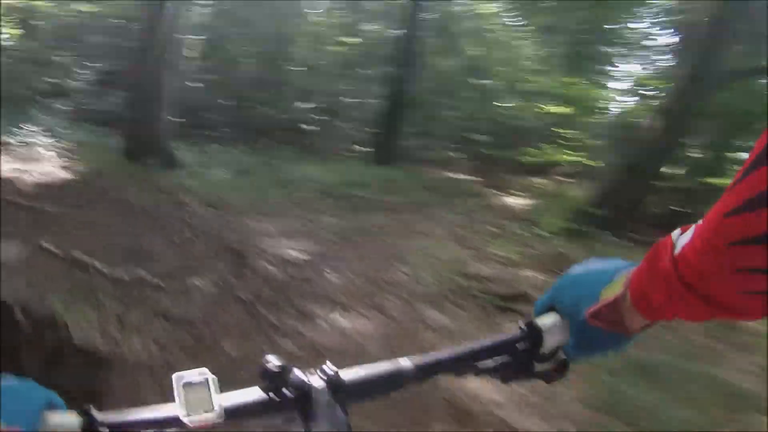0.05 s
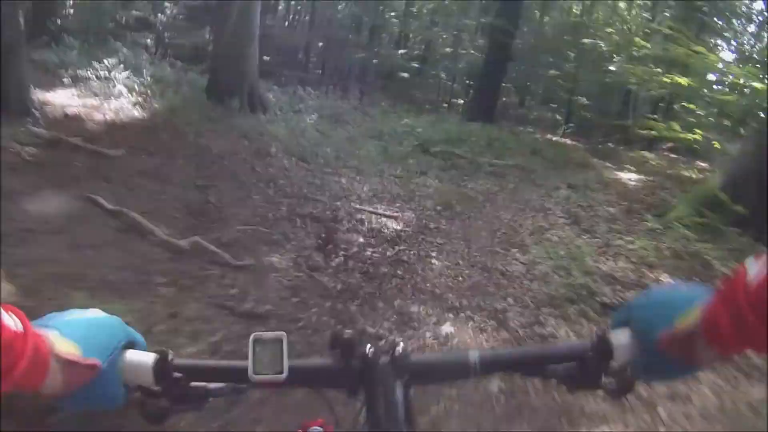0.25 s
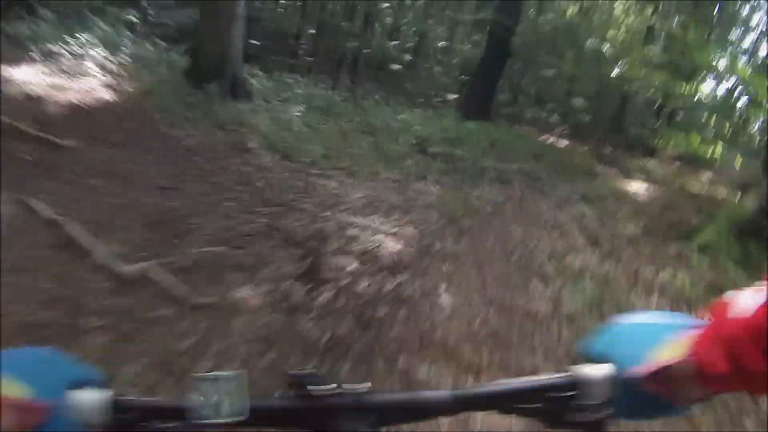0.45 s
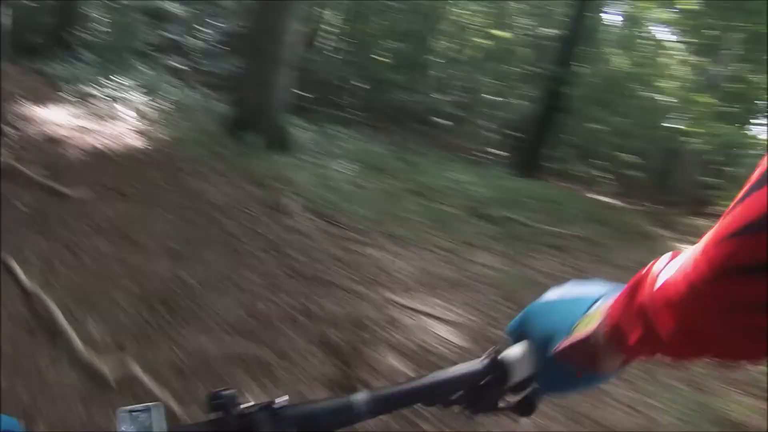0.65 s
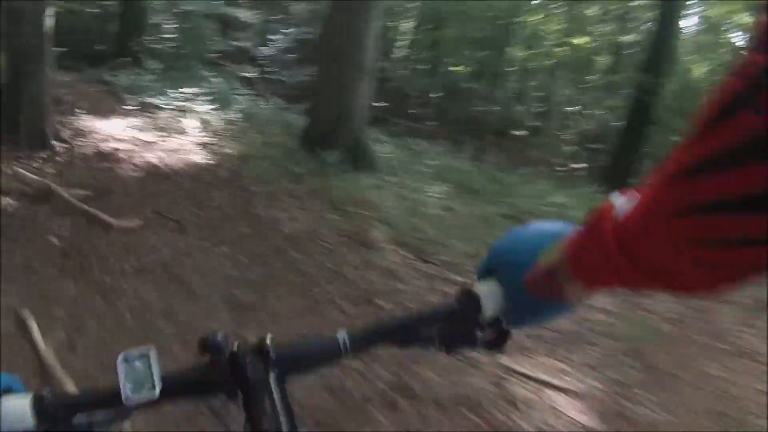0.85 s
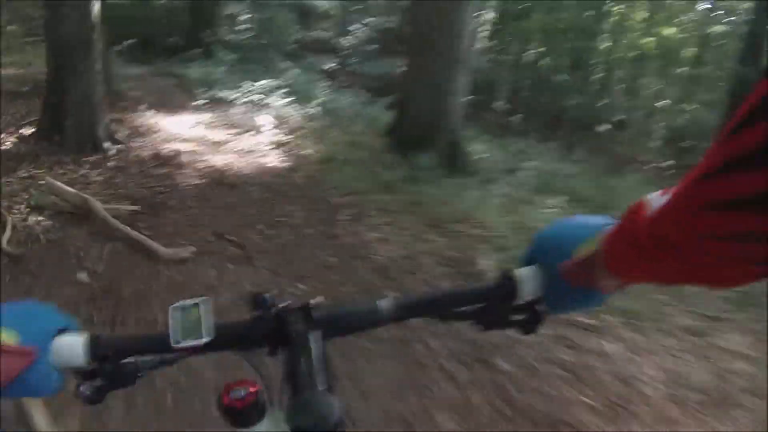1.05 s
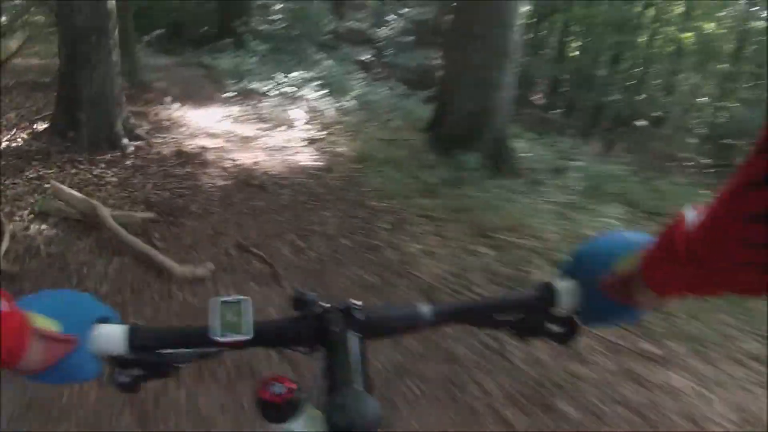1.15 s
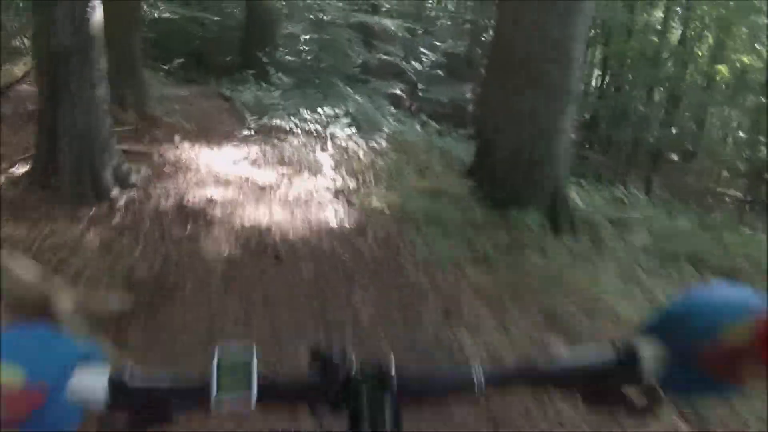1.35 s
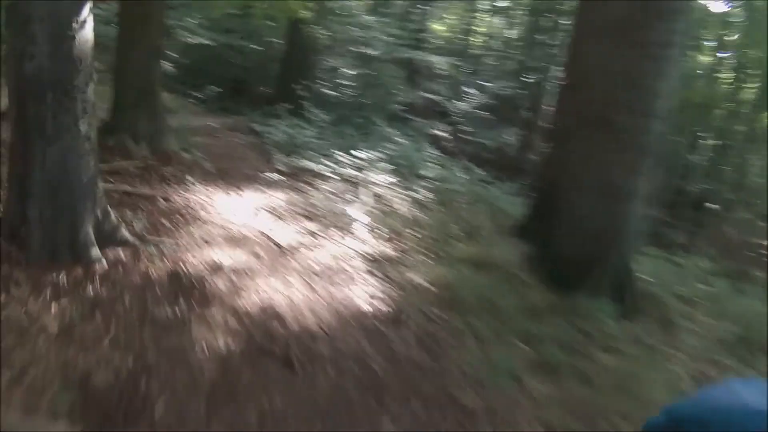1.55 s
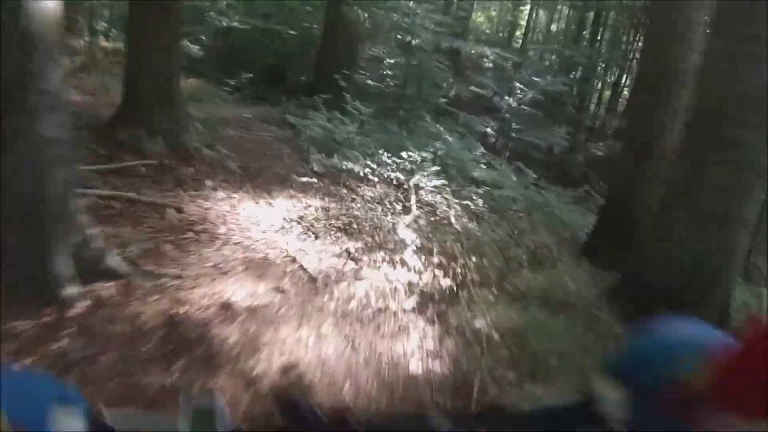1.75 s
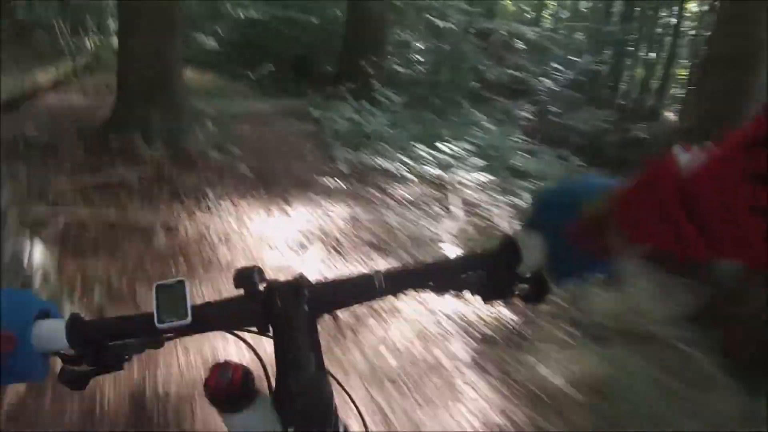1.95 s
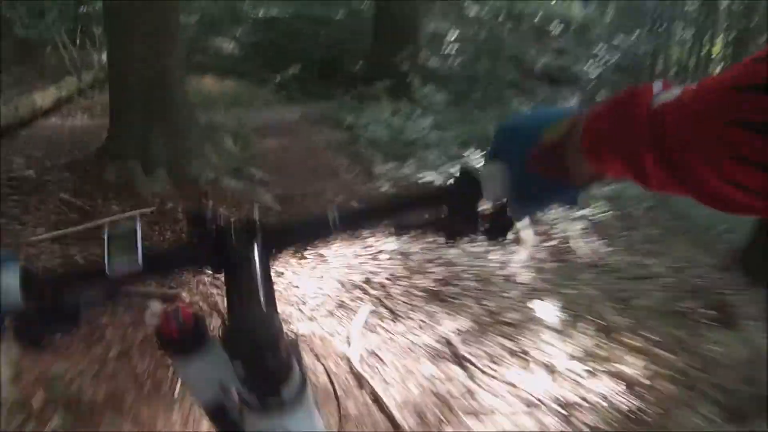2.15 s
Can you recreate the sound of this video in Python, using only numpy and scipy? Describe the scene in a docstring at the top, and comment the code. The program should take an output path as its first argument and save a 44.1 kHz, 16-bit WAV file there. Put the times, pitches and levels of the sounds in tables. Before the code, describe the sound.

Mountain bike rolling over dirt and leaves, freehub ticking, loose parts rattling and clacking sharply twice.

```python
"""Freehub ticking on a mountain bike that coasts down a forest trail; two pawls drop into each tooth.
Tyres roll over dirt, dry leaves and roots and snap twigs. Loose parts rattle on bumps and clack twice,
ringing the plastic case of the rider's camera and a smaller fitting; the frame knocks dully.
Air and jolts buffet the microphone."""
import sys
import numpy as np
from scipy import signal
from scipy.fft import rfft, irfft, next_fast_len
from scipy.io import wavfile
from scipy.ndimage import map_coordinates

SR = 44100
rng = np.random.default_rng(int(sys.argv[2]) if len(sys.argv) > 2 else 0)


def inscribe(sig):
    """Save sig as 16-bit PCM at rate SR to the path in sys.argv[1].

    A 1-D sig is mono; a 2-D sig holds one channel per row.
    Samples are clipped to [-1, 1] before scaling.
    """
    pcm = np.round(np.clip(np.atleast_2d(sig).T, -1, 1) * 32767)
    wavfile.write(sys.argv[1], SR, pcm.astype(np.int16))


N = 97020

# tyres on dirt, envelope: t/s, relative level/dB
DIRT_ENVELOPE = [(0.0, -61), (0.28, -55.5), (2.2, -54)]
# dirt spectrum: f/Hz, relative level/dB
DIRT_SPECTRUM = [(250, -13.5), (1200, -14.5), (1600, 3.5), (1980, -7), (2350, 3.5), (2750, -13),
                 (3300, 4.5), (3750, -7), (4300, -26), (9000, -57), (15000, -78)]
# leaf crunch, envelope: t/s, relative level/dB
LEAF_ENVELOPE = [(0.0, -70), (2.0, -66.5), (2.2, -54.5)]
# leaf and twig spectrum: f/Hz, relative level/dB
LEAF_SPECTRUM = [(600, -12.5), (1500, 3), (5600, 3.5), (6400, 0), (7200, 4.5), (8300, -4.5), (10300, -3),
                 (15500, -30)]
# tread scraping through leaves: t/s, length/s, relative level/dB
LEAF_SCRAPES = [(.44, 0.093, -65), (1.0, 0.065, -59), (1.10, 0.07, -57.5), (1.885, 0.13, -58.5),
                (2.068, 0.068, -54), (2.16, .07, -55.5)]
# tyres scrubbing bare earth in the bend: t/s, length/s, level/dB
EARTH_SCRUBS = [(.33, .22, -63)]
# earth spectrum: f/Hz, relative level/dB
EARTH_SPECTRUM = [(200, -22), (680, 7), (1300, -34)]
# wheels over roots: t/s, length/s, level/dB
ROOT_RUMBLES = [(.66, 0.043, -60), (1.0, 0.32, -64.5), (1.48, 0.04, -54), (1.54, 0.17, -61),
                (1.78, 0.16, -64.5)]
# rolling drone spectrum: f/Hz, relative level/dB
DRONE_SPECTRUM = [(40, 7), (95, 1), (190, -6.5), (500, -15.5), (1100, -16), (3000, -50), (12000, -100)]
# air buffeting, envelope: t/s, level/dB
WIND_ENVELOPE = [(0, -46), (.3, -44.5), (1.45, -40.5), (2.2, -46.5)]
# buffeting spectrum: f/Hz, relative level/dB
WIND_SPECTRUM = [(4, -14), (15, -2.5), (28, -8), (60, -29.5), (300, -61.5)]
# pressure thumps from jolts: t/s, peak/dB, half width/s
JOLTS = [(0.313, -33.5, 0.01), (0.688, -38, 0.0045), (0.491, -33, 0.013), (1.003, -28, 0.012),
         (1.201, -23.5, 0.013), (1.497, -25, 0.0088), (1.896, -33, 0.0067)]
# freehub speed: t/s, rate/(teeth/s)
TOOTH_RATE = [(0.03, 34.68), (0.269, 44.2), (0.311, 32.03), (0.475, 47.15), (0.538, 35.09), (0.744, 35.45),
              (0.867, 44.83), (1.076, 35.03), (1.238, 34.6), (1.283, 42.34), (1.477, 30.43), (1.613, 39.25),
              (1.888, 42.73), (2.029, 35.04), (2.2, 32.97)]
# freehub envelope: t/s, relative level/dB
HUB_ENVELOPE = [(0, -48), (.17, -42.5), (.39, -48), (.57, -42), (.88, -47), (1.15, -42), (1.5, -48.5),
                (1.76, -42.5), (2.2, -47.5)]
# contact crack spectrum: f/Hz, relative level/dB
CRACK_SPECTRUM = [(200, -13), (1200, -7), (1500, 8.5), (3800, 3.5), (5300, 0), (6200, -7.5), (7200, -1),
                  (8400, -8.5), (10300, -4), (15500, -28.5)]
# twigs snapping: t/s, level/dB
TWIG_SNAPS = [(.118, -53.5), (1.9225, -41), (1.9335, -38)]
# camera case modes: f/Hz, relative level/dB, T60/s
CASE_MODES = [(1451, 4, .037), (1622, 4, .046), (1860, -13, .035), (2336, 8, .026), (2495, 6, .021),
              (2810, -15, .035), (3160, -5, .019), (3325, -13, .045), (3574, -10, .015), (4498, -16, .022),
              (7170, -8, .025)]
# small loose fitting, modes: f/Hz, relative level/dB, T60/s
FITTING_MODES = [(1635, -8, .038), (1961, -3, .018), (2335, -3, .032), (3385, 2, .025), (3840, 2, .013),
                 (5269, -13, .019), (6964, -11, .015)]
# light rattles on bumps: t/s, relative level/dB
BUMP_RATTLES = [(0.257, -39), (0.29, -42), (0.3600, -45.5), (0.4445, -46.5), (0.4767, -44), (0.5107, -43),
                (0.5755, -46.5), (0.647, -43.5), (1.0038, -39.5), (1.2085, -44.5), (1.447, -43),
                (1.539, -47), (1.5673, -46), (1.6220, -43), (1.672, -44), (1.741, -44.5), (1.9085, -41)]
# first clack, on the case: t/s, ring gain/dB, focus/Hz, crack/dB
CASE_CONTACTS = [(.97127, -8, 5400, -31), (.97188, -12.5, 3470, -21), (.97463, -30, 2550, -14),
                 (.97828, -23, 3090, -22.5), (.98665, -48, 7000, -30)]
# second clack, on the fitting: t/s, ring gain/dB, focus/Hz, crack/dB
FITTING_CONTACTS = [(1.28023, -31, 3980, -36), (1.2844, -19, 5140, -31), (1.28685, -13.5, 3860, -23),
                    (1.28874, -22, 2200, -25), (1.30734, -39, 2860, -38)]
# frame knocks: t/s, level/dB
FRAME_KNOCKS = [(.953, -43), (1.168, -50), (1.284, -41)]
# frame spectrum: f/Hz, relative level/dB
FRAME_SPECTRUM = [(90, 0), (170, -6), (290, -0.5), (450, -12.5), (1500, -28)]


def amp(db):
    """dB to gain."""
    return 10 ** (np.asarray(db) / 20)


def unit(x):
    """Scale to rms 1."""
    return x / np.sqrt(np.mean(x ** 2) + 1e-20)


def curve(rows):
    """One value per sample from (t/s, value) rows."""
    return np.interp(np.arange(N) / SR, *np.transpose(rows))


def wobble(rate_hz):
    """Smooth curve through random knots."""
    knots = rng.standard_normal(int(N * rate_hz / SR) + 4)
    return map_coordinates(knots, [np.arange(N) * rate_hz / SR])


def colour(x, spectrum):
    """Minimum-phase filter; white noise keeps its power."""
    size = next_fast_len(N + SR // 4) * 2
    hz, db = np.transpose(spectrum)
    bins_hz = np.fft.rfftfreq(size, 1 / SR)
    gain = unit(amp(np.interp(np.log(bins_hz + 1), np.log(hz + 1), db)))
    cepstrum = irfft(np.log(gain + 1e-6), size)
    cepstrum[1:size // 2] *= 2
    cepstrum[size // 2 + 1:] = 0
    return irfft(rfft(x, size) * np.exp(rfft(cepstrum)), size)[:N]


def butterworth(x, order, cutoff_hz, kind):
    """Low- or high-pass."""
    return signal.sosfilt(signal.butter(order, cutoff_hz, kind, fs=SR, output="sos"), x)


def add(track, at_s, sound):
    """Mix a sound into the track."""
    i = int(np.clip(round(at_s * SR), 0, N))
    track[i:i + len(sound)] += sound[:N - i]


def fade(t, t60_s):
    """Exponential decay."""
    return np.exp(-np.log(1000) * t / t60_s)


def gritty(spectrum, grain_db, grain_rate_hz=700):
    """Coloured noise in tiny clumps, rms 1."""
    return unit(colour(rng.standard_normal(N) * amp(grain_db * wobble(grain_rate_hz)), spectrum))


def swells(rows, edge_s=.011):
    """Sum of trapezoid gains."""
    t = np.arange(N) / SR
    return sum(amp(db) * np.clip(np.minimum(t - at_s, at_s + length_s - t) / edge_s, 0, 1)
               for at_s, length_s, db in rows)


def bursts(rows, spectrum, t60_s):
    """Decaying puffs of coloured noise."""
    out, t = np.zeros(N), np.arange(SR // 6) / SR
    for at_s, db in rows:
        add(out, at_s, amp(db) * fade(t, t60_s) * rng.standard_normal(len(t)))
    return colour(out, spectrum)


def tyres():
    """Tread grinds dirt, crunches and scrapes leaves, scrubs earth; a low drone swells on roots."""
    dirt_db = curve(DIRT_ENVELOPE) + 1 + 1.2 * wobble(rate_hz=44.85)
    dirt = amp(dirt_db) * gritty(DIRT_SPECTRUM, grain_db=3)
    leaves_db = curve(LEAF_ENVELOPE) + 1.5 + 2.2 * wobble(rate_hz=60.3)
    leaves = amp(leaves_db) * gritty(LEAF_SPECTRUM, grain_db=-2)
    litter = gritty(LEAF_SPECTRUM, grain_db=6) + amp(6.5) * gritty(DIRT_SPECTRUM, grain_db=6)
    scrapes = swells(LEAF_SCRAPES) * litter
    drone_gain = amp(-54.5 + .77 * wobble(rate_hz=25.63)) + swells(ROOT_RUMBLES)
    drone = drone_gain * gritty(DRONE_SPECTRUM, grain_db=.5)
    scrub = swells(EARTH_SCRUBS) * gritty(EARTH_SPECTRUM, grain_db=6)
    return dirt + leaves + scrapes + scrub + drone


def wind():
    """Low buffeting at the microphone; a pressure dip per jolt."""
    out = amp(curve(WIND_ENVELOPE)) * unit(colour(rng.standard_normal(N), WIND_SPECTRUM))
    for at_s, peak_db, half_width_s in JOLTS:
        u = (np.arange(N) / SR - at_s) / half_width_s
        out -= amp(peak_db) * (1 - u ** 2) * np.exp(-.5 * u ** 2)
    return out


def pawl_ring(centre_hz, t60_s, sigma_hz=460, rise_s=.0013):
    """One pawl drop: a brief ring of narrow-band noise."""
    t = np.arange(1024) / SR
    hz = np.fft.rfftfreq(len(t), 1 / SR)
    envelope = (1 - np.exp(-(t / rise_s) ** 2)) * fade(t, t60_s)
    envelope /= envelope.max()
    band = np.exp(-.5 * ((hz - centre_hz) / sigma_hz) ** 2)
    ring = irfft(rfft(rng.standard_normal(len(t))) * band) * envelope
    return ring * np.linalg.norm(envelope) / np.linalg.norm(ring)


def freehub(t60_s=.013, max_lag_s=.005, jitter_s=.0005, scatter_db=1.7, scatter_hz=260):
    """Two pawls drop into each tooth, the second later and softer; one faint bright click per tooth."""
    teeth = np.cumsum(curve(TOOTH_RATE)) / SR
    ticks_s = np.interp(np.arange(.11, teeth[-1]), teeth, np.arange(N) / SR)
    rings = np.zeros(N)
    for at_s in ticks_s:
        for lag_s, db, hz in [(0, 0, 2660), (max_lag_s * rng.random(), -4, 3370)]:
            shift_s, shift_db, shift_hz = rng.normal(0, [jitter_s, scatter_db, scatter_hz])
            add(rings, at_s + lag_s + shift_s, amp(db + shift_db) * pawl_ring(hz + shift_hz, t60_s))
    rings = butterworth(rings, order=10, cutoff_hz=3800, kind="low")
    clicks = bursts([(at_s, -14) for at_s in ticks_s], CRACK_SPECTRUM, t60_s)
    clicks = butterworth(clicks, order=2, cutoff_hz=8500, kind="low")
    return amp(curve(HUB_ENVELOPE)) * (rings + clicks)


def twigs():
    """Twigs snap under the tyres."""
    return bursts(TWIG_SNAPS, LEAF_SPECTRUM, t60_s=.023)


def contacts(rows, part_modes, slope_db_per_oct=12.5):
    """Each contact rings the part, favouring modes near its focus, and adds a crack with a faint tail."""
    rings, cracks, t = np.zeros(N), np.zeros(N), np.arange(SR // 6) / SR
    hz, db, t60_s = np.transpose(part_modes)
    polarity = (-1) ** np.arange(len(hz))[:, None]
    modes = polarity * np.sin(2 * np.pi * hz[:, None] * t) * fade(t, t60_s[:, None])
    crack_envelope = fade(t, t60_s=.009) + amp(-24) * fade(t, t60_s=.14)
    for at_s, ring_db, focus_hz, crack_db in rows:
        loss_db = slope_db_per_oct * np.abs(np.log2(hz / focus_hz))
        add(rings, at_s, amp(ring_db + db - loss_db + rng.standard_normal(len(hz))) @ modes)
        add(cracks, at_s, amp(crack_db) * crack_envelope * rng.standard_normal(len(t)))
    bright_rings = butterworth(rings, order=3, cutoff_hz=1210, kind="high")  # the rings are thinned below about 1.2 kHz by a gentle high-pass
    return bright_rings + colour(cracks, CRACK_SPECTRUM)


def rattles(focus_hz=1720, crack_offset_db=-6):
    """Loose parts tap on bumps and ring the case."""
    return contacts([(at_s, db, focus_hz, db + crack_offset_db) for at_s, db in BUMP_RATTLES], CASE_MODES)


def frame_knocks():
    """Dull knocks of the bike frame."""
    return bursts(FRAME_KNOCKS, FRAME_SPECTRUM, t60_s=.094)


def clacks():
    """Two clusters of hard contacts: case, then fitting."""
    return contacts(CASE_CONTACTS, CASE_MODES) + contacts(FITTING_CONTACTS, FITTING_MODES)


def scene():
    """All sources at one microphone."""
    return (tyres() + wind() + freehub() + twigs() + rattles() + frame_knocks() + clacks())[None]


def record(dry):
    """Camera band limit."""
    size = next_fast_len(N + SR // 2)
    bins_hz = np.fft.rfftfreq(size, 1 / SR)
    return irfft(rfft(dry, size) * (bins_hz < 15700), size)[..., :N]


dry = scene()
out = record(dry)
inscribe(out)
```